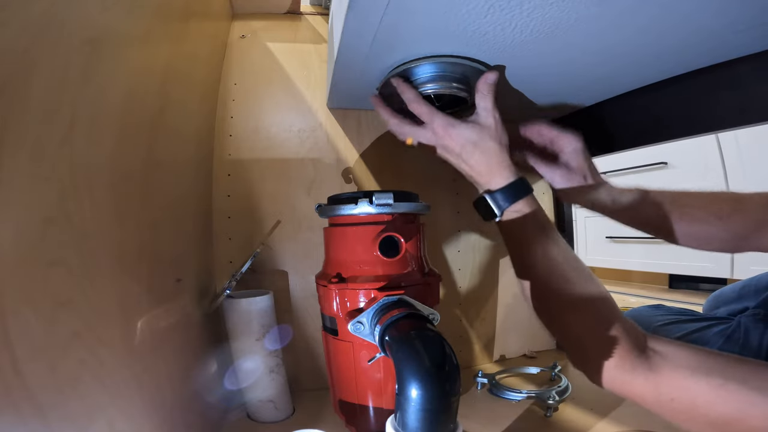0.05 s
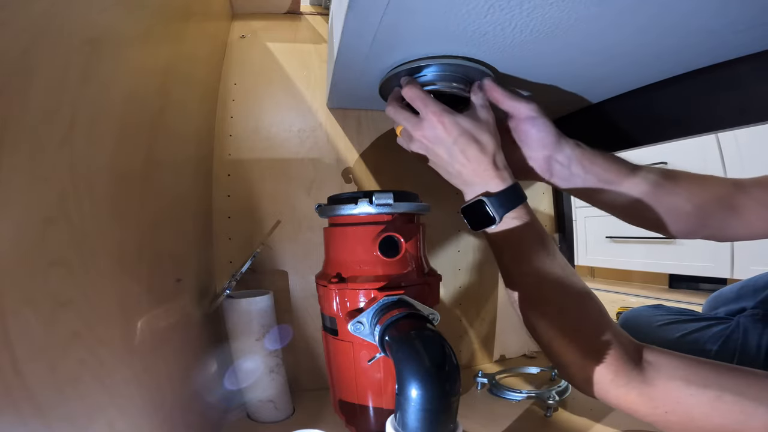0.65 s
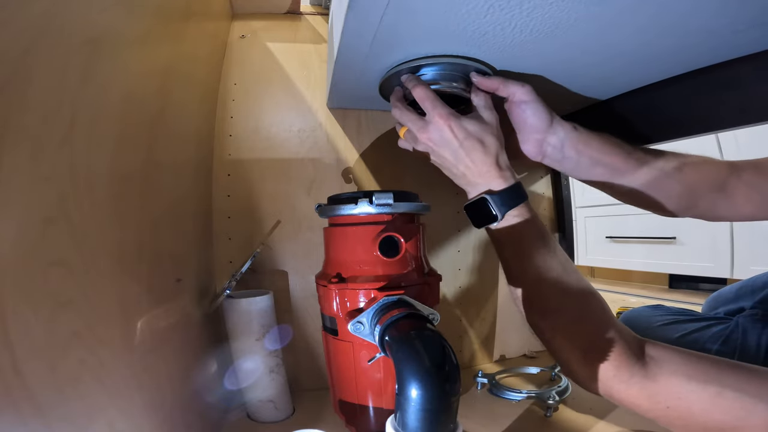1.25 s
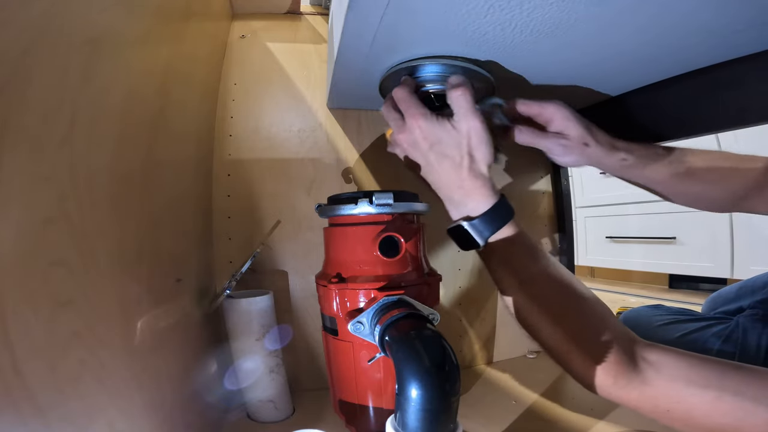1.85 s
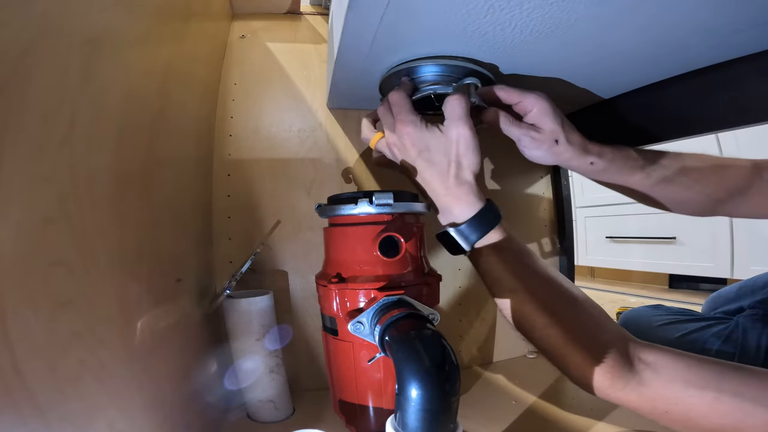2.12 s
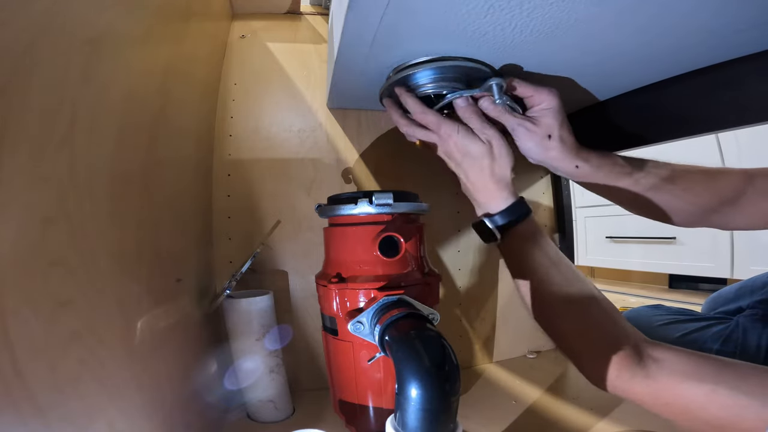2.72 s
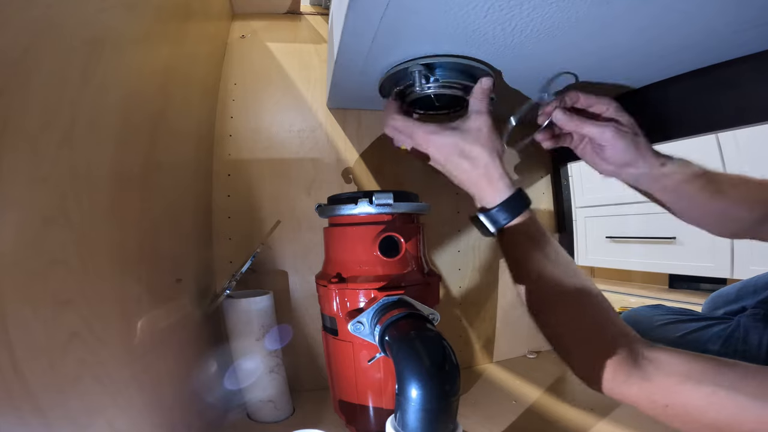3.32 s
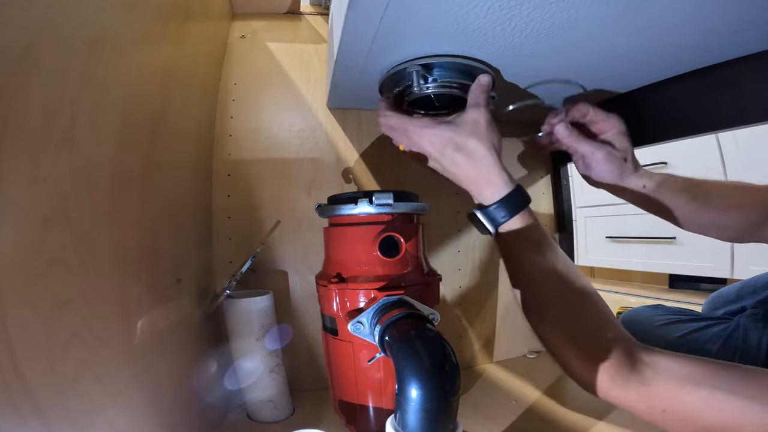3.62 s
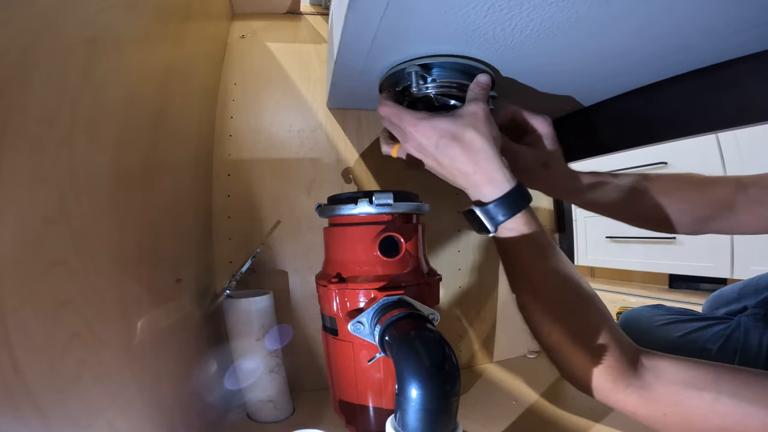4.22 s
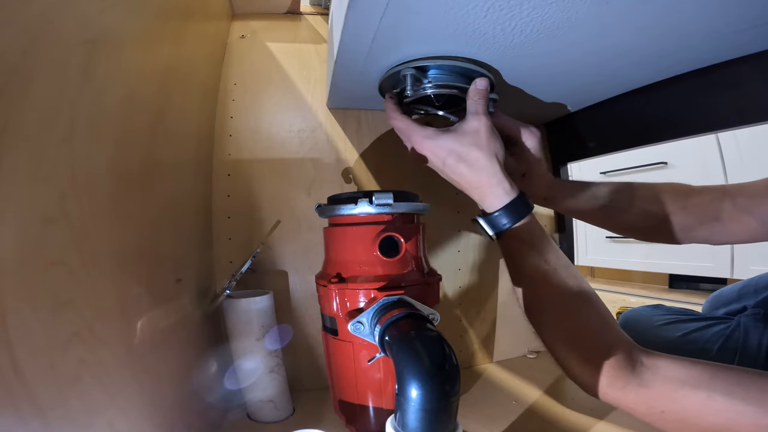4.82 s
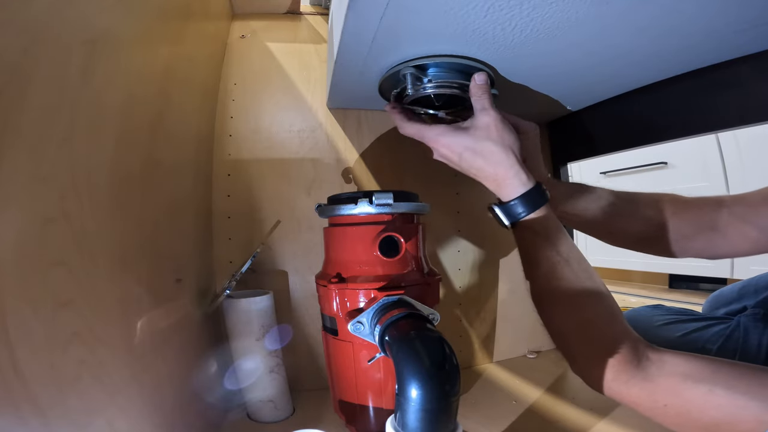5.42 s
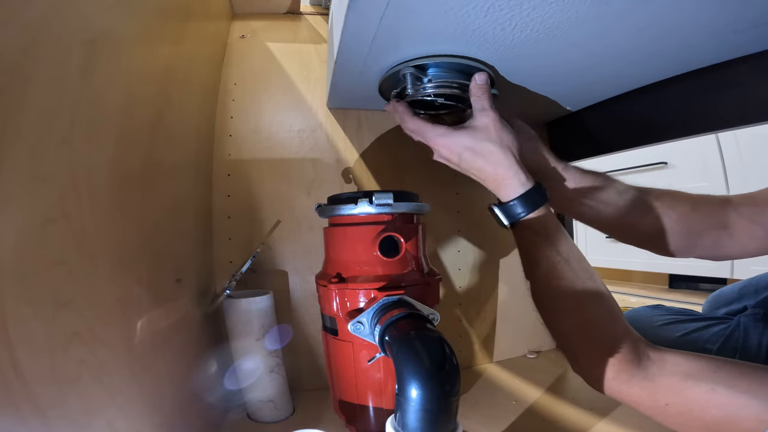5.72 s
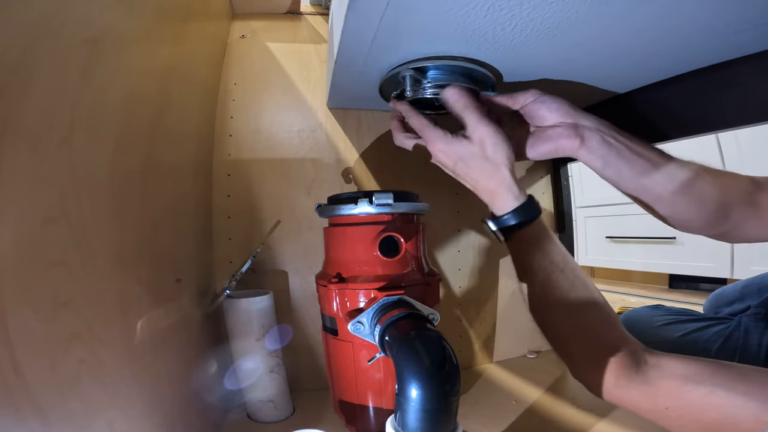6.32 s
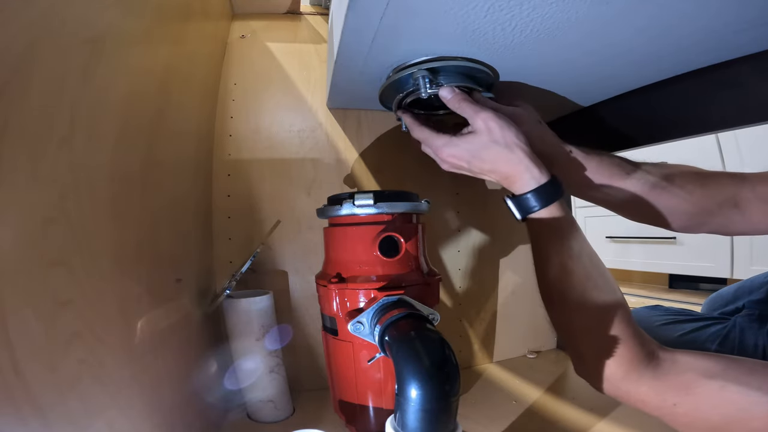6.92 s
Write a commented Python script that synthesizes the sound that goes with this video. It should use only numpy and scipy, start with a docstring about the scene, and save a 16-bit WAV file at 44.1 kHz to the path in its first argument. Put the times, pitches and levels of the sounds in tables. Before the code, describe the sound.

Hands work metal fittings under a kitchen sink, making bright clinks, sharp clicks, brief squeaky scrapes and low bumps.

```python
"""First come a few bright clinks: a loose steel plate is struck and slides under a kitchen sink.
Hands work the mounting rings and a wire snap ring on the drain flange (the drain's steel rim).
Struck parts click and ring; dragged parts stick and slip, so they scrape and squeal. The basin and
counter boom dully, and the wooden cabinet echoes. The sound dips briefly halfway through. Near
the end the rings clank on the flange, and the ringing cuts off suddenly."""
import sys
import numpy as np
from scipy import signal
from scipy.fft import rfft, irfft
from scipy.io import wavfile
from scipy.ndimage import uniform_filter1d

SR = 44100
rng = np.random.default_rng(int(sys.argv[2]) if len(sys.argv) > 2 else 0)


def store_wav(level_fs):
    """Save 16-bit WAV to argv[1]."""
    pcm = np.round(np.clip(np.atleast_2d(level_fs), -1, 1) * 32767)
    wavfile.write(sys.argv[1], SR, pcm.T.astype(np.int16))


N = 306936
TIME = np.arange(N) / SR
HIT_TIME = np.arange(16384) / SR
LEAD_S = 0.04  # a blow starts scuffing this long before it lands


def amp(db):
    """Turns decibels into a gain."""
    return 10 ** (np.asarray(db) / 20)


def unit_rms(x):
    """Scales a sound to an average power of 1."""
    return x / np.sqrt(np.mean(x ** 2) + 1e-20)


def unit_energy(x):
    """Scales a sound to a total energy of 1."""
    return x / np.linalg.norm(x)


def value_at(points, hz):
    """Reads between a table's rows on a log-frequency scale."""
    row_hz, value = np.transpose(points)
    return np.interp(np.log(hz + 1), np.log(row_hz + 1), value)


def add(mix, start_s, sound):
    """Adds a sound to the mix at a given time."""
    start = round(start_s * SR)
    sound = sound[..., max(-start, 0):]
    part = mix[..., max(start, 0):][..., :sound.shape[-1]]
    part += sound[..., :part.shape[-1]]


def through(x, response):
    """Makes every sample of x set off the given response."""
    return signal.fftconvolve(x, response)[:len(x)]


def colour(x, points):
    """Makes each frequency louder or softer, following a table."""
    hz = np.fft.rfftfreq(len(x), 1 / SR)
    return irfft(rfft(x) * amp(value_at(points, hz)), len(x))


def tick(points, bright_db=0, hollow_db=0, size=2048):
    """One click with a given tone colour; each spot touched can add its own hollow resonances."""
    hz = np.fft.rfftfreq(size, 1 / SR)
    ripple = uniform_filter1d(uniform_filter1d(rng.standard_normal(len(hz)), size=14), size=10)
    hollow = hollow_db * np.tanh(unit_rms(ripple))
    treble = bright_db * value_at([(5500, 0.081), (10000, 0.93)], hz)
    log_gain = np.log(amp(value_at(points, hz) + hollow + treble))
    mirrored = np.r_[log_gain, log_gain[-2:0:-1]]
    spectrum = np.exp(np.conj(signal.hilbert(mirrored)))  # packs the energy at the click's start
    return unit_energy(np.fft.ifft(spectrum).real)


def dying(t, fade_s):
    """A smooth fade that falls 60 dB in fade_s."""
    return np.exp(-np.log(1000) * t / fade_s)


def mode(hz, fade_s):
    """One natural note of an object: a fading sine wave."""
    return unit_energy(dying(HIT_TIME, fade_s) * np.sin(2 * np.pi * hz * HIT_TIME))


def slips(count, per_s, spread_db):
    """Surfaces stick and slip, giving tiny random kicks of uneven size."""
    happens = rng.random(count) < per_s / SR
    size = np.minimum(rng.exponential(1, count), 3.5)
    sign = rng.choice([-1, 1], count)
    return unit_rms(sign * happens * amp(spread_db * size))


def blow(chatter_s, scuff_db):
    """The force of a hit: the part scuffs along, bites, then settles in small bounces."""
    t = HIT_TIME - LEAD_S
    age = np.maximum(t, 0) / chatter_s
    bounces = (1 - np.exp(-age / 0.08)) * (np.exp(-age) + 0.1 * np.exp(-age / 3))
    scuff = amp(scuff_db) * np.exp(-abs(t) / 0.01)
    return unit_energy(slips(len(t), per_s=6000, spread_db=2) * (scuff + bounces))


def steel(force, notes, sustain, tilt_db):
    """Steel rings in close pairs of notes, new at each touch; a grip scales their fade by `sustain`."""
    ring = 0
    for hz, db, fade_s in notes:
        strength, detune = rng.standard_normal(2)
        twin = mode(hz * (1 + 0.012 * detune), fade_s * sustain / 2)
        pair = mode(hz, fade_s * sustain) + 0.34 * twin
        ring += amp(db + tilt_db * np.log2(hz) + 2 * strength) * unit_energy(through(force, pair))
    return unit_energy(ring)


# the basin's notes: pitch_hz, level_db
BASIN_NOTES = [(198, 0.5), (398, 3), (495, -3), (723, -10), (852, -7), (1261, -14)]
def basin(force, tone):
    """The sink's sheet steel gives a broad bump and short notes that shift under the hand's pressure."""
    shifts = 1 + 0.015 * rng.standard_normal(len(BASIN_NOTES))
    ring = sum(amp(db) * unit_energy(through(force, mode(hz * shift, fade_s=0.06)))
               for (hz, db), shift in zip(BASIN_NOTES, shifts))
    bump = unit_energy(through(force, tick(tone)))
    return unit_energy(bump + amp(-5) * unit_energy(ring))


# tone colour of steel touching steel: pitch_hz, level_db
CONTACT_TONE = [(400, -44), (1500, -6.5), (3200, 4.5), (5900, 4.5), (7100, -2), (9000, -10), (12800, -15),
                (15500, -41)]
# tone colour of the bumped basin: pitch_hz, level_db
BUMP_TONE = [(70, -14.5), (165, 3.5), (240, 1), (620, -10.5), (860, -9.5), (1400, -17), (2100, -19.5),
             (9000, -73.5)]
def clack(force, contact_db, basin_db, bright_db):
    """The contact clicks, brighter when hit harder, and the basin bumps under it."""
    click = through(force, tick(CONTACT_TONE, bright_db + 0.53 * contact_db, hollow_db=3))
    return amp(contact_db) * unit_energy(click) + amp(basin_db) * basin(force, BUMP_TONE)


def hits(rows, notes, sustain, ring_db, bright_db, scuff_db):
    """Blows on steel; a loose part chatters longer, rings more and clacks less. Gives (clatter, ring)."""
    out = np.zeros((2, N))
    for start_s, contact_db, basin_db, chatter_s in rows:
        force = blow(chatter_s, scuff_db)
        looseness = amp(ring_db + 6 * np.log2(chatter_s / 0.011))
        ring = amp(contact_db) * looseness * steel(force, notes, sustain, tilt_db=0.1 * contact_db)
        clatter = clack(force, contact_db, basin_db, bright_db) / np.hypot(1, looseness)
        add(out, start_s - LEAD_S, np.array([clatter, ring]))
    return out


# the loose plate's notes when free: pitch_hz, level_db, fade_s
PLATE_NOTES = [(2030, -13.5, 0.38), (2575, -5.5, .15), (3323, -2, 0.08), (3417, -1.5, 0.12),
               (4059, 1, 0.21), (4910, -0.5, .11), (6520, -1.5, 0.2), (7820, -7, 0.12), (9730, -17, 0.09)]
# blows on the plate: start_s, contact_db, basin_db, chatter_s
PLATE_HITS = [(0.026, -10.5, -3, 0.0025), (0.166, -7, -3, 0.012), (0.183, -3, -2.5, 0.0089),
              (0.652, -14, -14.5, 0.0082), (2.728, -11.5, -18, 0.03)]
def clinks():
    """The loose plate is struck and rings on."""
    return hits(PLATE_HITS, PLATE_NOTES, sustain=0.93, ring_db=3, bright_db=-11, scuff_db=-19.5)


def strokes(rows, notes, basin_tone, sustain, rise_share, per_s, grain_db, catch_db, tilt_db):
    """Rubbing swells, catches and fades, shaking the basin and the steel. Gives (clatter, ring)."""
    out = np.zeros((2, N))
    for peak_s, length_s, contact_db, basin_db, ring_db in rows:
        rise_s = length_s * rise_share
        fall_s = length_s - rise_s
        t = np.arange(max(peak_s - 2 * rise_s, 0), peak_s + 2 * fall_s + 0.27, 1 / SR) - peak_s
        speed = amp(-13 * np.where(t < 0, abs(t / rise_s) ** 3.5, (t / fall_s) ** 2))
        catches = unit_rms(uniform_filter1d(rng.standard_normal(len(t)), size=500))
        force = speed * amp(catch_db * catches) * slips(len(t), per_s, grain_db)
        # the contact moves, so one hollow tone gives way to another
        travel = np.pi / 2 * np.clip((t + rise_s) / length_s, 0, 1)
        rubbing = sum(through(force * share, tick(CONTACT_TONE, bright_db=1.5, hollow_db=5))
                      for share in (np.cos(travel), np.sin(travel)))
        clatter = amp(contact_db) * unit_energy(rubbing) + amp(basin_db) * basin(force, basin_tone)
        ring = amp(ring_db) * steel(force, notes, sustain, tilt_db)
        add(out, peak_s + t[0], np.linalg.norm(speed) * np.array([clatter, ring]))
    return out


# sliding moves: peak_s, length_s, contact_db, basin_db, ring_db
LOOSE_SLIDES = [(0.07, 0.081, -48, -36.5, -62), (0.305, 0.084, -50.5, -46.5, -43),
                (0.495, 0.13, -57.5, -55, -53), (0.74, 0.13, -60.5, -50, -56.5),
                (1.09, 0.17, -55, -44.5, -55), (1.525, 0.083, -56.5, -45.5, -59),
                (2.32, 0.22, -59.5, -42.5, -62), (2.56, 0.17, -49.5, -38.5, -44.5),
                (2.97, 0.073, -46, -31, -47), (3.2, 0.2, -59, -37.5, -57), (6.86, 0.24, -62.5, -56, -70)]
def slides():
    """Loose rings slide and sing with the plate's notes."""
    return strokes(LOOSE_SLIDES, PLATE_NOTES, BUMP_TONE, sustain=1, rise_share=0.46,
                   per_s=1600, grain_db=4.5, catch_db=5.5, tilt_db=-1.5)


def fidgets():
    """Fingertips keep shifting on the fitting: faint, dull ticks at random moments."""
    force = through(slips(N, per_s=14, spread_db=3.5), blow(chatter_s=0.0032, scuff_db=-12))
    ticks = unit_rms(through(force, tick(CONTACT_TONE, bright_db=-20.5)))
    return amp(-81) * ticks + amp(-69) * unit_rms(basin(force, BUMP_TONE))


# tone colour of the room's air: pitch_hz, level_db
AIR_TONE = [(110, -19), (286, -32.5), (390, -16.5), (570, -39), (3400, -43), (15000, -64.5)]
def room_air():
    """A quiet, steady hush."""
    return amp(-62) * unit_rms(colour(rng.standard_normal(N), AIR_TONE))


def echoes(fades, delay_s):
    """A crowd of tiny echoes, each pitch dying at its own speed."""
    hz, t, bands = signal.stft(slips(SR // 2, per_s=5000, spread_db=4), SR, nperseg=256)
    tail = signal.istft(bands * dying(t, value_at(fades, hz)[:, None]), SR, nperseg=256)[1]
    return np.r_[np.zeros(round(delay_s * SR)), unit_energy(tail)]


# how long the cabinet and the kitchen echo: pitch_hz, fade_s
CABINET_FADES = [(250, 0.22), (1000, 0.13), (13000, 0.049)]
KITCHEN_FADES = [(2500, 0.41), (12000, 0.02)]
def room(x):
    """Close wooden walls, whose echoes change as the arms move, and the faint kitchen beyond."""
    shares = np.cos(np.pi * (TIME + np.arange(3)[:, None] / 3)) * np.sqrt(2 / 3)  # squares sum to 1
    cabinet = sum(through(x * share, echoes(CABINET_FADES, delay_s=0.001005)) for share in shares)
    kitchen = through(x, echoes(KITCHEN_FADES, delay_s=0.011))
    return amp(-3) * cabinet + amp(-20) * kitchen


# how the basin's shaking passes into the counter: pitch_hz, gain_db
INTO_COUNTER = [(500, 2.5), (2000, -22)]
# tone colour of the counter's rumble: pitch_hz, level_db
RUMBLE_TONE = [(6, -18.5), (24, 2), (85, 0.5), (125, -4), (200, -17), (1100, -94)]
# hands lean on the fitting: middle_s, half_length_s, level_db
LEANS = [(0.6, 0.53, -33), (5.48, 0.099, -35.5), (5.883, 0.32, -37), (6.334, 0.052, -30.5)]
def rumble(clatter, settle_s=0.025):
    """The heavy counter rumbles as the basin is shaken or leant on, and settles a little later."""
    keep = np.exp(-1 / (settle_s * SR))
    shaking = np.sqrt(signal.lfilter([1 - keep], [1, -keep], colour(clatter, INTO_COUNTER) ** 2))
    leaning = sum(amp(db) * np.exp(-((TIME - middle_s) / half_s) ** 2) for middle_s, half_s, db in LEANS)
    noise = unit_rms(colour(rng.standard_normal(N), RUMBLE_TONE))
    return np.hypot(amp(-14) * shaking ** 0.46, leaning) * noise


# the counter's notes: pitch_hz, level_db
COUNTER_NOTES = [(66, -1), (88, 4.5), (122, 5.5), (198, -0.5)]
# hands shove the sink: start_s, level_db, push_s
SHOVES = [(0.340, 6, 0.00024), (0.446, 9, 0.0017), (0.521, 9.5, 0.0032), (1.122, 6, 0.00031),
          (2.725, 18.5, 0.00049), (3.056, 11, 0.0003), (3.583, 13, 0.00018), (3.605, 12.5, 0.0018),
          (5.328, -1.5, 0.00029), (5.974, 2.5, 0.0056), (6.133, 6.5, 0.00085), (6.258, 8.5, 0.0025),
          (6.511, 15, 0.0017)]
def thuds():
    """Each shove is one soft pulse into the counter; a slower push gives a deeper thud."""
    out = np.zeros(N)
    counter = sum(amp(db) * mode(hz, fade_s=0.31) for hz, db in COUNTER_NOTES)
    for start_s, db, push_s in SHOVES:
        push = HIT_TIME * np.exp(-HIT_TIME / push_s)
        add(out, start_s, amp(db) * unit_energy(through(push, counter)))
    return out


# blows on tightly held parts: start_s, contact_db, basin_db, chatter_s
HELD_HITS = [(0.393, -19.5, -32, 0.00091), (1.253, -26.5, -39, 0.011), (3.578, -21, -4, 0.0084),
             (4.293, -1.5, -1, 0.014), (4.337, -5.5, -3.5, 0.024), (4.371, -4, -5, 0.0077),
             (4.825, -13, -5.5, 0.0035), (4.858, -14.5, -14, 0.0055), (4.916, -19, -14.5, 0.0038),
             (5.235, -20, -21.5, 0.0055), (5.375, -28, -30, 0.0021), (5.594, -1.5, -11.5, 0.0028),
             (5.736, -28.5, -21.5, 0.0025), (5.972, -29.5, -20.5, 0.0094), (6.081, -19.5, -11.5, 0.022),
             (6.261, 1.5, 0.5, 0.0029), (6.593, -25.5, -25.5, 0.001)]
def snaps():
    """Fingers stop the steel from ringing, so only the click and the basin are heard."""
    out = np.zeros(N)
    for start_s, contact_db, basin_db, chatter_s in HELD_HITS:
        force = blow(chatter_s, scuff_db=-17)
        add(out, start_s - LEAD_S, clack(force, contact_db, basin_db, bright_db=7))
    return out


# the mounting ring's notes when free: pitch_hz, level_db, fade_s
MOUNT_NOTES = [(3400, -6, 0.05), (4330, 1, 0.09), (5660, -4, .08), (6670, -2.5, 0.07), (9340, -6.5, 0.13),
               (10450, -8.5, 0.08), (12680, -12.5, .08)]
# blows of the mounting ring: start_s, contact_db, basin_db, chatter_s
MOUNT_HITS = [(1.564, -16, -24.5, 0.0077), (1.972, 5.5, 10.5, 0.01), (2.017, 2, 13.5, .012),
              (2.105, -12.5, -15.5, 0.0026), (2.162, -14.5, -18, 0.0046), (2.242, -2.5, 5, 0.0024),
              (2.378, -16, -18, 0.005), (2.721, 1, 13.5, 0.016), (3.027, -2.5, 12, 0.0081),
              (3.083, -2.5, 2, 0.01), (3.206, -18, -10.5, 0.0064), (3.242, -16.5, -6, 0.0084)]
def knocks():
    """The mounting ring knocks on the flange and rings briefly."""
    return hits(MOUNT_HITS, MOUNT_NOTES, sustain=1, ring_db=-2.5, bright_db=4.5, scuff_db=-32.5)


# squeals and groans: start_s, length_s, from_hz, to_hz, level_db
EDGE_DRAGS = [(2.533, 0.087, 3400, 3400, -42), (2.619, 0.043, 2410, 2680, -36),
              (3.297, 0.058, 1210, 1340, -34), (4.405, 0.091, 1164, 767, -40.5),
              (4.701, 0.23, 1240, 1480, -47.5)]
def squeals(width_hz=210, waver=0.013):
    """A dragged edge catches: its slips sing in one note that glides as the contact moves."""
    out = np.zeros(N)
    keep = np.exp(-np.pi * width_hz / SR)
    for start_s, length_s, from_hz, to_hz, db in EDGE_DRAGS:
        progress = np.arange(0, length_s, 1 / SR) / length_s
        wobble = unit_rms(uniform_filter1d(rng.standard_normal(len(progress)), size=600))
        pitch_hz = (from_hz + (to_hz - from_hz) * progress) * (1 + waver * wobble)
        spin = np.exp(2j * np.pi * np.cumsum(pitch_hz) / SR)
        force = slips(len(progress), per_s=4500, spread_db=7.5)
        # keep only a narrow band around the moving pitch
        tone = spin * signal.lfilter([1], np.poly([keep, keep]), force / spin)
        add(out, start_s, amp(db) * np.sin(np.pi * progress) * unit_rms(tone.real))
    return out


# tone colour of the scraped basin: pitch_hz, level_db
RASP_TONE = [(100, 3), (180, 3.5), (290, -5.5), (410, -1.5), (620, -7.5), (900, -5), (1800, -14),
             (9000, -74)]
# scraping moves: peak_s, length_s, contact_db, basin_db, ring_db
HELD_SCRAPES = [(2.635, 0.062, -32, -28.5, -36.5), (3.08, .09, -39.5, -26, -41),
                (3.312, 0.098, -44, -25.5, -52), (3.595, 0.041, -39.5, -43, -42),
                (4.365, 0.11, -41, -34, -52), (4.45, .1, -50, -39, -65), (4.775, 0.16, -50, -45.5, -73),
                (5.58, 0.34, -63, -56, -70)]
def scrapes():
    """Gripped parts scrape on the flange; the grip shortens their ringing."""
    return strokes(HELD_SCRAPES, MOUNT_NOTES, RASP_TONE, sustain=0.55, rise_share=0.45,
                   per_s=1400, grain_db=5, catch_db=2.5, tilt_db=-5)


def dip(depth_db, start_s=3.322, end_s=3.445, drop_s=0.0075, return_s=0.05):
    """A gain that drops suddenly for a moment, then quickly comes back."""
    share = np.minimum((TIME - start_s) / drop_s, (end_s - TIME) / return_s)
    return amp(depth_db * np.clip(share, 0, 1))


# the wire ring's notes when free: pitch_hz, level_db, fade_s
WIRE_NOTES = [(1690, -13.5, .05), (2990, -10.5, .04), (3397, -1, 0.12), (4865, 2.5, 0.041),
              (9460, -10, 0.06), (9820, -9.5, 0.08), (9990, -15.5, 0.13), (12100, -11.5, .11)]
# blows of the wire ring: start_s, contact_db, basin_db, chatter_s
WIRE_HITS = [(3.447, 6, 1, 0.013), (3.8, -25, -23, 0.0027)]
def twangs():
    """The wire ring scuffs and springs against the flange."""
    return hits(WIRE_HITS, WIRE_NOTES, sustain=0.93, ring_db=0.5, bright_db=-6.5, scuff_db=-4)


# the flange's notes: pitch_hz, level_db, fade_s
FLANGE_NOTES = [(2570, -11, 0.099), (3300, -5.5, 0.07), (4166, -1, 0.072), (4875, -1, 0.054),
                (6550, 3.5, 0.11), (9540, -12.5, 0.1), (12200, -17.5, 0.17)]
# blows on the flange: start_s, contact_db, basin_db, chatter_s
FLANGE_HITS = [(6.138, 6.5, 1, 0.004), (6.48, 7, 3.5, 0.0088), (6.513, 5, 3.5, 0.011)]
def clanks():
    """The seated rings clank on the flange and set it ringing."""
    return hits(FLANGE_HITS, FLANGE_NOTES, sustain=1, ring_db=4.5, bright_db=-10, scuff_db=-21.5)


# stereo width, wider for higher sounds: pitch_hz, side_gain_db
STEREO_WIDTH = [(150, -26.5), (550, -15), (1200, -7), (9000, -6), (13000, 2.5)]
def scene(ring_stop_s=6.595):
    """All the handling in the cabinet, over quiet room air. Gives (left, right)."""
    clatter, ring = clinks() + clanks() + knocks() + twangs() + slides() + scrapes()
    clatter = clatter + snaps() + squeals() + fidgets()
    ring *= uniform_filter1d(1.0 * (TIME < ring_stop_s), size=300)  # the ringing cuts off suddenly
    air_middle, air_side = room_air(), room_air()
    counter = (rumble(clatter) + thuds()) * dip(depth_db=-17)
    # the ringing is heard mostly direct, with little echo
    metal = amp(-2) * clatter + ring + room(clatter + 0.14 * ring)
    metal_dip = dip(depth_db=-43)
    middle = metal * metal_dip + counter + air_middle
    side = colour(room(clatter + 0.51 * ring) * metal_dip + air_side, STEREO_WIDTH)
    return np.array([middle + side, middle - side])


def record(dry, tilt_db=3, bottom_hz=10, top_hz=15700):
    """Lifts the top treble on the left, lowers it on the right, and trims the extreme lows and highs."""
    left = colour(dry[0], [(9500, 0), (12500, tilt_db)])
    right = colour(dry[1], [(9500, 0), (12500, -tilt_db)])
    low_pass = signal.firwin(511, top_hz, window=("kaiser", 9), fs=SR)
    high_pass = signal.butter(1, bottom_hz, "highpass", fs=SR)
    return signal.oaconvolve(signal.lfilter(*high_pass, [left, right]), low_pass[None], "same")


dry = scene()
out = record(dry)
store_wav(out)
```